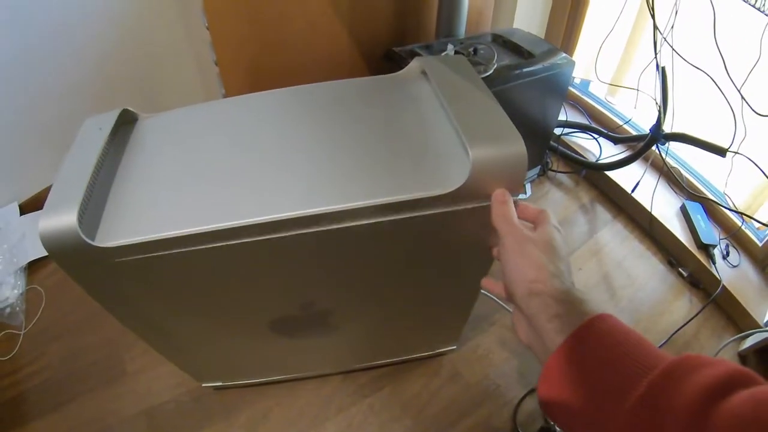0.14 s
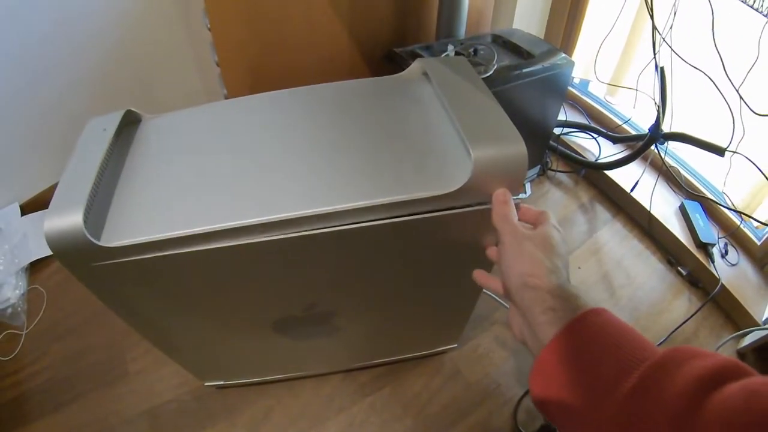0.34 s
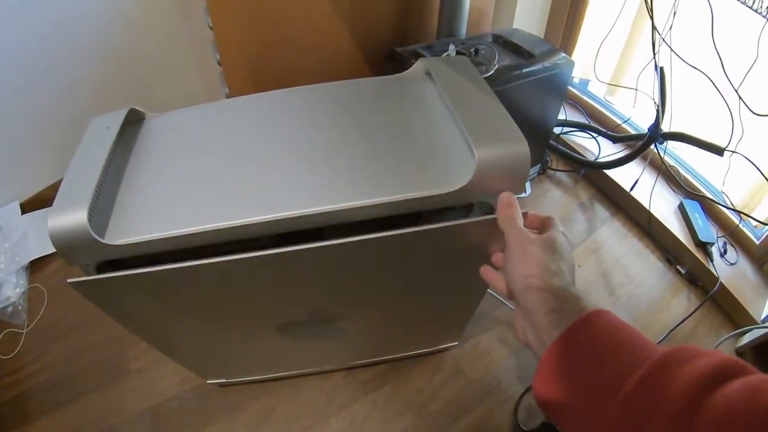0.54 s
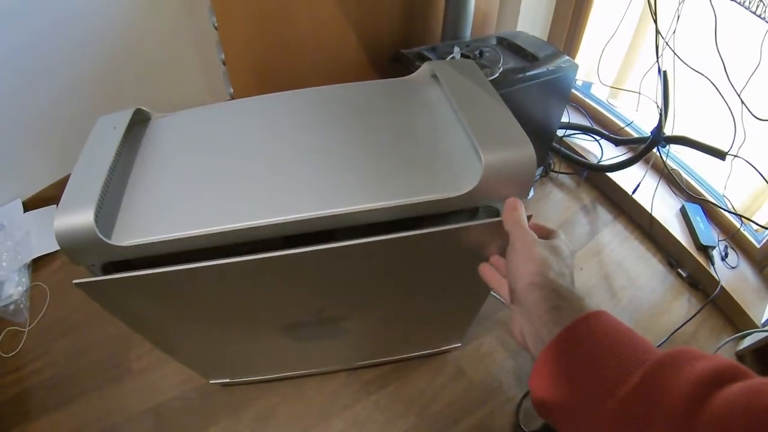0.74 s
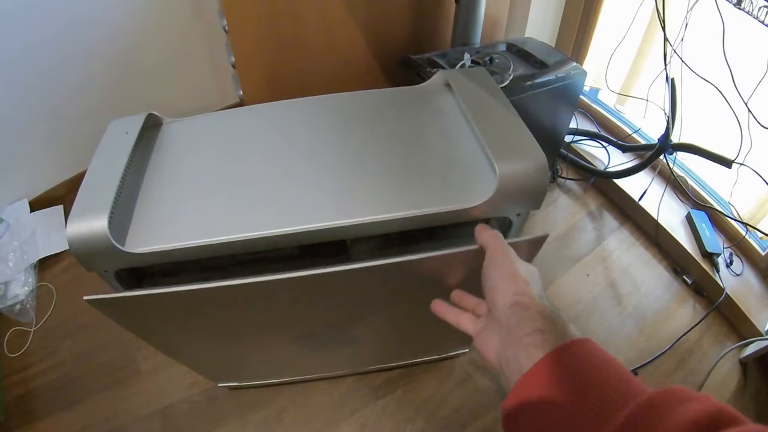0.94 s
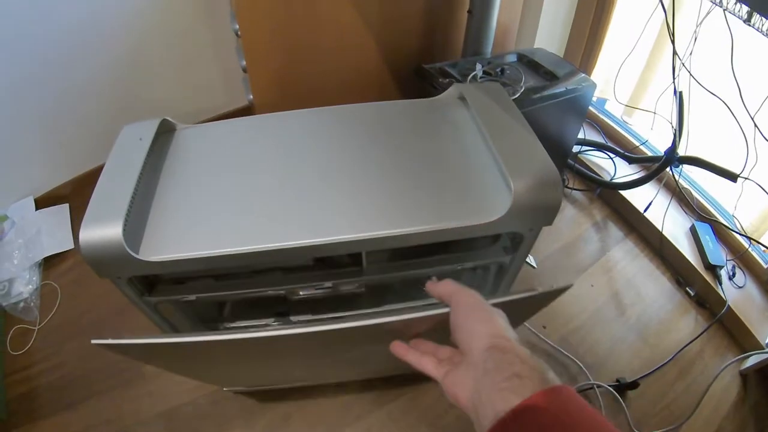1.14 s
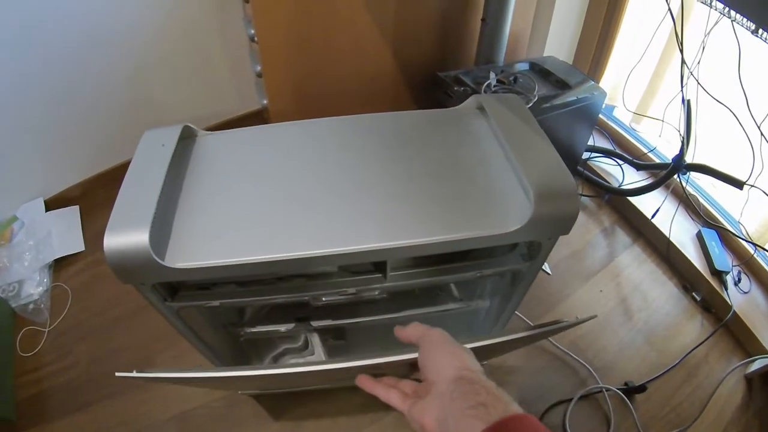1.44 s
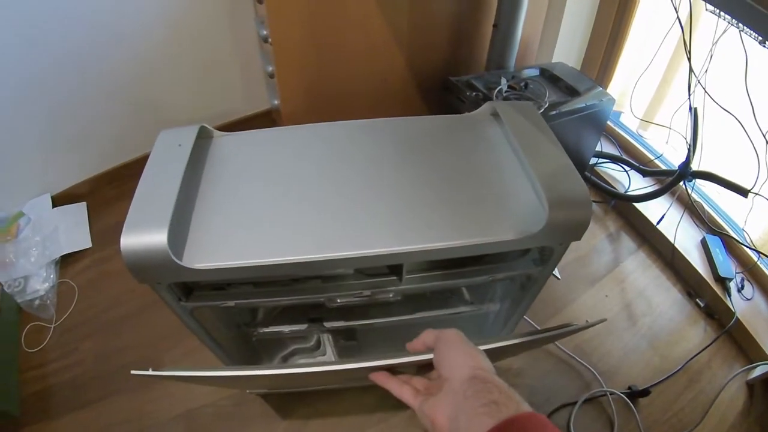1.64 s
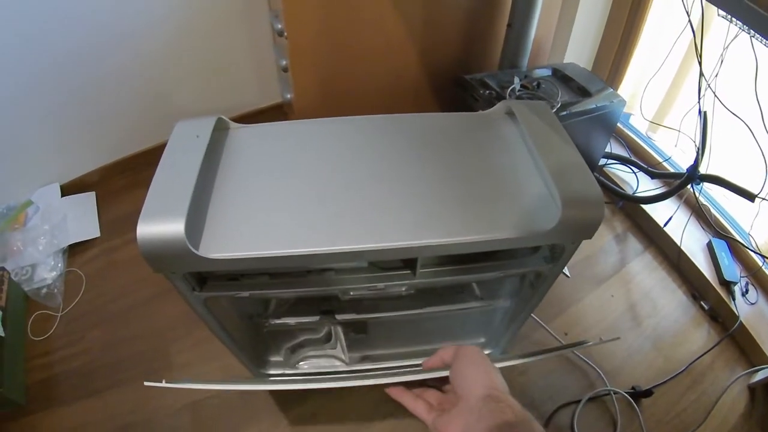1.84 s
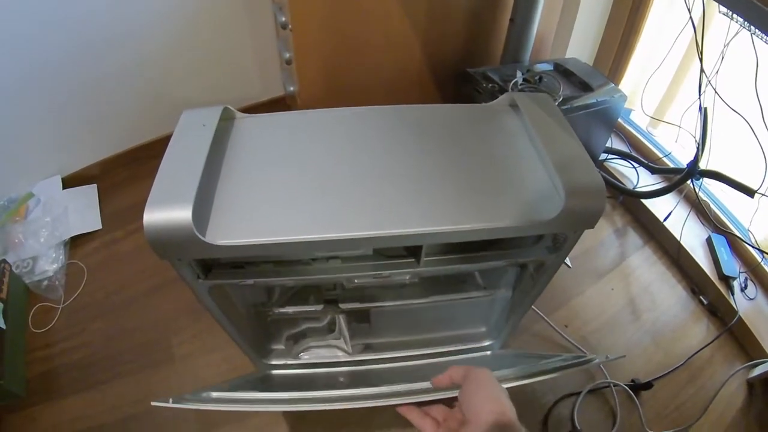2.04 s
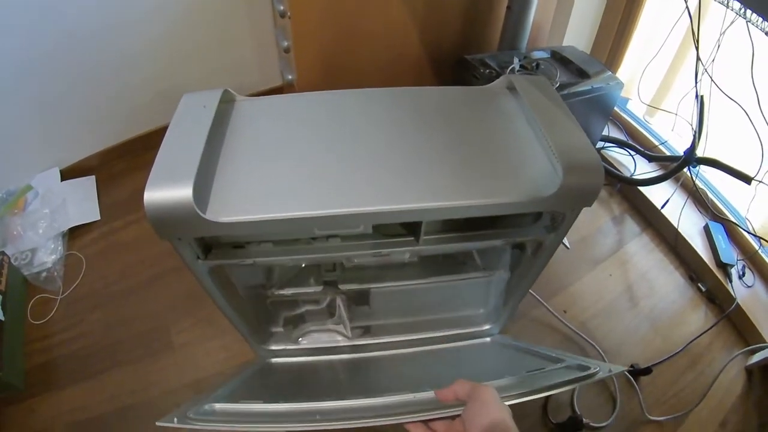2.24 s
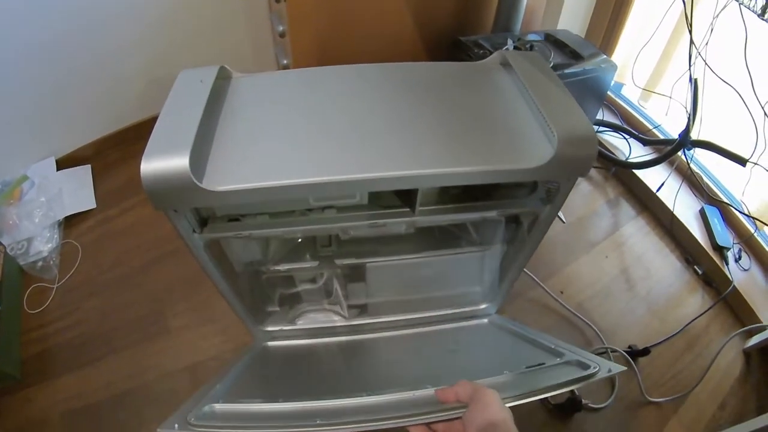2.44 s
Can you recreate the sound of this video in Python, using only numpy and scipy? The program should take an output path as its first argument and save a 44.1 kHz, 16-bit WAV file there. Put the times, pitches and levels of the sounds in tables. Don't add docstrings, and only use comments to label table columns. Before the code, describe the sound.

A sheet-metal side panel snaps off a computer case with clatter, then knocks in its slot

```python
import sys
import numpy as np
from scipy import signal
from scipy.fft import rfft, irfft, next_fast_len
from scipy.io import wavfile

SR = 44100
rng = np.random.default_rng(int(sys.argv[2]) if len(sys.argv) > 2 else 0)


def field_ratio(decibels):
    return 10 ** (np.asarray(decibels, dtype=float) / 20)


def log_audio(samples):
    frames = np.atleast_2d(samples).T
    limited = np.clip(frames, -1, 1)
    pcm = np.round(limited * 32767).astype(np.int16)
    wavfile.write(sys.argv[1], SR, pcm)


N = 114660


def rms_one(x):
    return x / np.sqrt(np.mean(x ** 2) + 1e-20)


def in_time(rows):
    s, *columns = np.transpose(rows)
    t = np.arange(N) / SR
    gate = np.clip(np.minimum(t - s[0], s[-1] - t) / 0.008, 0, 1)
    return [np.interp(t, s, c) for c in columns] + [gate]


def colour(x, points):
    hz, db = np.transpose(points)
    log_hz = np.log(np.arange(N // 2 + 1) * SR / N + 0.1)
    log_points = np.log([hz[0] / 2, *hz, hz[-1] * 2])
    gain_db = np.interp(log_hz, log_points, [db[0] - 30, *db, db[-1] - 30])
    return rms_one(irfft(rfft(x) * field_ratio(gain_db), N))


def drift(rate_hz):
    r = np.exp(-2 * np.pi * rate_hz / SR)
    return rms_one(signal.lfilter([1], [1, -2 * r, r * r], rng.standard_normal(N + SR))[SR:])


def ring(x, hz, t60):
    r, w = field_ratio(-60 / (t60 * SR)), 2 * np.pi * hz / SR
    return signal.lfilter([0, np.sin(w)], [1, -2 * r * np.cos(w), r * r], x + 1e-18)


def narrow_noise(hz, width_hz):
    t60 = np.log(1000) / np.pi / width_hz
    return rms_one(ring(rng.standard_normal(N + SR), hz, t60)[SR:])


# f/Hz, level/dB per Hz
AIR = [(30, -6), (45, -10), (71, -16.5), (281, -26.5), (500, -30.5), (4000, -42.5)]
# f/Hz, level/dB per Hz
HISS = [(3000, -5), (7500, -3), (10500, -5), (14500, -7)]
# f/Hz, level/dB rms
WHINES = [(9710, -72)]
AIR_DB, HISS_DB, WHINE_WIDTH_HZ = -56.5, -67, 90
CAPSULE_HZ, CAPSULE_WIDTH_HZ, CAPSULE_DB = 8800, 500, -72.5
SWAY_HZ, SWAY_WIDTH_HZ, SWAY_DB = 10.97, 5.7, -45.5


def background():
    air = field_ratio(AIR_DB) * colour(rng.standard_normal(N), AIR)
    hiss = field_ratio(HISS_DB) * colour(rng.standard_normal(N), HISS)
    capsule = field_ratio(CAPSULE_DB) * narrow_noise(CAPSULE_HZ, CAPSULE_WIDTH_HZ)
    whines = sum(field_ratio(db) * narrow_noise(hz, WHINE_WIDTH_HZ) for hz, db in WHINES)
    sway = rms_one(ring(narrow_noise(SWAY_HZ, SWAY_WIDTH_HZ), SWAY_HZ, 2 / SWAY_WIDTH_HZ))
    return air + hiss + capsule + whines + field_ratio(SWAY_DB) * sway


ROOM_T60_S, ROOM_DB, WALL_CUT_HZ = 0.14, -17.5, 8300


def room(x):
    size = next_fast_len(N + SR)
    z = np.exp(-2j * np.pi * np.arange(size // 2 + 1) / size)
    dull = np.exp(-2 * np.pi * WALL_CUT_HZ / SR)
    wall = (1 - dull) / (1 - dull * z)
    response = 0
    for k, lag in enumerate((np.geomspace(0.009, 0.031, 10) * SR).astype(int)):
        loop = field_ratio(-60 * lag / SR / ROOM_T60_S) * wall * z ** lag
        response = response + (-1) ** k * loop / (1 - loop)
    return irfft(rfft(x, size) * response, size)[:N]


# t/s, f/Hz, level/dB rms
SQUEAK = [
    (2.37, 7600, -81),
    (2.395, 7840, -74),
    (2.412, 8030, -67),
    (2.43, 8230, -63),
    (2.465, 8190, -64.5),
    (2.54, 8500, -61),
    (2.564, 7980, -69),
    (2.583, 7600, -72),
    (2.6, 7530, -80),
]
SQUEAK_WOBBLE_HZ, SQUEAK_FLUTTER_DB = 28, 3


def squeak():
    hz, db, gate = in_time(SQUEAK)
    phase = 2 * np.pi * np.cumsum(hz + SQUEAK_WOBBLE_HZ * drift(60)) / SR
    level = field_ratio(db + SQUEAK_FLUTTER_DB * drift(57))
    return gate * np.sqrt(2) * level * np.sin(phase)


# t/s, level/dB
PALM = [
    (0.93, -79),
    (0.978, -52.5),
    (1.002, -63),
    (1.068, -57),
    (1.132, -63),
    (1.266, -57.5),
    (1.302, -62.5),
    (1.428, -56.5),
    (1.56, -77.5),
]
# f/Hz, level/dB per Hz
SKIN = [(1500, -16), (2800, -8.5), (4150, -4), (5600, -8.5), (7500, -3), (8600, 1), (10000, -4.5),
        (14000, -16)]
# t/s, f/Hz
GAP = [
    (0.93, 8950),
    (1.064, 9050),
    (1.14, 8620),
    (1.2, 8800),
    (1.244, 8400),
    (1.316, 8700),
    (1.438, 8560),
    (1.56, 8620),
]
SKIN_PATCHY_DB, GAP_WIDTH_HZ, GAP_DB = -1, 400, -5


def palm():
    db, gate = in_time(PALM)
    hz, _ = in_time(GAP)
    phase = 2 * np.pi * np.cumsum(hz) / SR
    level = gate * field_ratio(db + SKIN_PATCHY_DB * drift(46))
    hiss = colour(rng.standard_normal(N), SKIN)
    whistle = drift(GAP_WIDTH_HZ) * np.cos(phase) + drift(GAP_WIDTH_HZ) * np.sin(phase)
    return level * (hiss + field_ratio(GAP_DB) * whistle)


# t/s, level/dB
FLEXES = [
    (0.497, -38.5),
    (0.53, -38.5),
    (0.732, -45.5),
    (0.862, -45),
    (2.301, -51),
]
FLEX_HZ, FLEX_T60_S, PUSH_HZ = 55.9, 0.45, 121


def flex():
    push = np.zeros(N)
    for s, db in FLEXES:
        push[int(s * SR)] = field_ratio(db)
    soft = signal.butter(2, PUSH_HZ, fs=SR, output="sos")
    return ring(signal.sosfilt(soft, push + 1e-18), FLEX_HZ, FLEX_T60_S)


# t/s, level/dB, f/Hz, t60/s
KNOCKS = [(0.217, -46, 330, 0.11), (0.25, -53.5, 454, 0.11), (0.232, -52, 575, 0.13),
          (0.492, -37.5, 424, 0.12), (0.512, -38, 424, 0.087), (0.506, -39, 1290, .05),
          (0.572, -40, 325, .08), (0.276, -50.5, 336, 0.11), (0.491, -41, 360, .12),
          (0.49, -47, 242, 0.088), (0.515, -38.5, 850, 0.11), (0.495, -44, 1245, 0.092),
          (0.57, -39, 625, 0.075), (0.555, -44, 333, 0.13), (0.612, -43, 418, 0.14),
          (2.235, -57, 635, 0.12), (2.24, -50, 196, 0.11), (2.309, -37.5, 412, 0.066),
          (2.303, -44.5, 694, 0.11), (2.303, -45, 880, 0.054), (2.308, -42.5, 244, .12),
          (0.5812, -27.5, 3620, .04), (0.538, -30, 5150, 0.036), (0.535, -32, 3600, 0.043),
          (0.629, -32.5, 4730, 0.034), (0.557, -36, 8350, .03), (2.303, -38.5, 4240, .02),
          (2.303, -41, 3040, .03), (0.9062, -46, 6550, .025), (0.909, -48, 2540, .045),
          (0.9455, -46.5, 2550, .04), (0.9062, -47.5, 4250, 0.044), (2.345, -46, 150.2, 0.42)]


def knocks():
    out = np.zeros(N)
    for s, db, hz, t60 in KNOCKS:
        t = np.maximum(np.arange(N) / SR - s, 0)
        rise = 1 - np.exp(-t * hz)
        out += field_ratio(db - 60 * t / t60) * rise * np.sin(2 * np.pi * hz * t)
    return out


# f/Hz, level/dB
EDGE_MODES = [(2560, -15), (3030, -4.5), (3620, -5), (4140, -2), (4750, -7), (5170, -8.5), (6935, -5.5),
              (7400, -19), (8310, -4), (8650, -4.5), (8820, 0)]
EDGE_T60_S, EDGE_RING_DB = 0.035, -7.5


def edge_ring(x):
    modes = sum(field_ratio(db) * ring(x, hz, EDGE_T60_S) for hz, db in EDGE_MODES)
    return field_ratio(EDGE_RING_DB) * modes / np.sqrt(EDGE_T60_S * SR)


GRAINS_PER_S, GRAIN_SPREAD_DB = 5000, 3.0


def grains():
    sizes = field_ratio(GRAIN_SPREAD_DB * np.minimum(rng.exponential(1, N), 4)) * rng.choice([-1, 1], N)
    return rms_one(sizes * (rng.random(N) < GRAINS_PER_S / SR))


# t/s, speed as bright level/dB, weight on the sheet as dull level/dB
STROKES = [
    [(0.11, -82, -62), (0.128, -66, -69), (0.17, -56.5, -66), (0.19, -54.5, -58), (0.21, -65, -58),
     (0.228, -74, -55), (0.256, -88, -60.5), (0.3, -85, -66)],
    [(0.472, -63, -68), (0.488, -53.5, -49.5), (0.5, -44, -41.5), (0.508, -38.5, -36.5),
     (0.558, -38.5, -36), (0.6, -43.5, -41.5), (0.622, -46, -46), (0.66, -49, -49), (0.78, -69.5, -59.5)],
    [(0.83, -55, -72), (0.852, -77, -62.5), (0.92, -62, -57.5), (0.935, -68, -64), (0.956, -56, -58),
     (1.0, -74, -71)],
    [(2.275, -68, -62), (2.288, -53, -56), (2.3, -46, -55), (2.315, -53, -41), (2.34, -58, -52),
     (2.37, -62, -57.5), (2.42, -69, -69), (2.44, -73, -63)],
]
# f/Hz, level/dB per Hz
EDGE = [(710, -29), (1200, -7.5), (1850, -6.5), (2010, -6), (2850, -7), (3600, -6), (6220, -5.5),
        (8370, -4), (14000, -33)]
# f/Hz, level/dB per Hz
BODY = [(170, -15), (270, -5), (420, -7.5), (833, -3.5), (1500, -8.5), (2500, -13)]
# f/Hz, level/dB, t60/s
PANEL = [(234.7, -6.5, 0.26), (328.3, -10, 0.23), (417, -0.5, 0.054), (500.4, -3, 0.12), (624, -9.5, 0.073),
         (670, -9, 0.2), (850.4, -7, 0.073), (1052, -18, 0.13), (1248, -11, 0.17), (1375, -12.5, 0.24),
         (1957, -12.5, 0.18)]
GRIND_DB, BODY_DB, PANEL_DB = -1, -4.5, 3.5


def grinding():
    bright, weight = np.zeros(N), np.zeros(N)
    for stroke in STROKES:
        speed_db, weight_db, gate = in_time(stroke)
        bright += gate * field_ratio(speed_db)
        weight += gate * field_ratio(weight_db)
    rub = grains()
    modes = sum(field_ratio(db) * ring(rub * weight, hz, t60) / np.sqrt(t60 * SR) for hz, db, t60 in PANEL)
    scrape = field_ratio(GRIND_DB) * bright * colour(grains(), EDGE)
    body = field_ratio(BODY_DB) * weight * colour(rub, BODY)
    return scrape + body + field_ratio(PANEL_DB) * modes


# t/s, peak level/dB, f/Hz
TICKS = [(0.4837, -44, 9000), (0.4877, -35, 8600), (0.5045, -22, 9100), (0.5064, -19, 8500),
         (0.5111, -24.5, 1790), (0.5227, -32, 7400), (0.525, -33, 6400), (0.5301, -33, 2800),
         (0.5339, -25.2, 6700), (0.5357, -26, 4000), (0.5386, -16, 7400), (0.54, -14, 5150),
         (0.5413, -16, 7100), (0.5544, -22.3, 9000), (0.5593, -22, 8100), (0.5645, -28, 3300),
         (0.568, -28.7, 2380), (0.571, -25, 8300), (0.575, -27, 8100), (0.5817, -12, 4840),
         (0.584, -14, 8450), (0.6076, -37, 8550), (0.6107, -33.6, 8800), (0.6149, -37, 3700),
         (0.6195, -35.2, 7600), (0.6292, -20, 6600), (0.6316, -21, 4830), (0.6421, -32.8, 7500),
         (0.6524, -35.8, 7400), (0.6593, -35.7, 7800), (0.6627, -37.9, 6500), (0.669, -39.0, 4700),
         (0.6743, -40.4, 3800), (0.6775, -41.6, 8400), (0.6815, -38, 4600), (0.6853, -44, 1800),
         (0.9065, -35.1, 3800), (0.9102, -39.2, 3900), (0.9133, -39, 2500), (0.9168, -43.0, 3900),
         (0.9247, -48.6, 3700), (0.9354, -48.6, 3500), (0.9447, -46.2, 4300), (0.9463, -39.6, 2600),
         (0.9524, -44.2, 2800), (0.9568, -45.5, 9000), (0.9585, -46.3, 9200), (2.2949, -40, 7400),
         (2.2973, -38.3, 6500), (2.3002, -37.0, 7100), (2.303, -21.5, 3420), (2.3053, -30, 3640),
         (2.3074, -33, 1790), (2.3119, -38, 2800), (2.319, -36.7, 2300), (2.322, -34, 2500),
         (2.3326, -39, 4800), (2.3375, -38, 2800)]
TICK_DB, TICK_CYCLES, TICK_LEAD_S, TICK_RISE_CYCLES = 1.5, 8.8, 0.0003, 1.26


def ticks():
    out, t = np.zeros(N + 512), np.arange(512) / SR
    for s, db, hz in TICKS:
        i = int((s - TICK_LEAD_S) * SR)
        decay = field_ratio(db + TICK_DB - 60 * t * hz / TICK_CYCLES)
        rise = np.minimum(t * hz / TICK_RISE_CYCLES, 1)
        out[i:i + 512] += decay * rise * np.sin(2 * np.pi * hz * t)
    return out[:N]


# t/s, peak level/dB, centre f/Hz, width/octaves, rattle length/s
SNAPS = [(0.138, -43, 7050, .6, .001), (0.174, -44, 5750, 0.33, 0.014), (0.186, -43, 3570, 0.2, .005),
         (0.5036, -25, 8500, 0.47, 0.0077), (0.5342, -20.5, 6500, 1.3, 0.0048),
         (0.5376, -16, 6130, 0.83, 0.0033), (0.5812, -18, 5000, 0.51, 0.003),
         (0.5822, -19, 6600, 1.42, 0.0053), (0.63, -23, 6500, 0.85, 0.0041), (0.685, -40, 2480, 1.2, 0.011),
         (0.729, -38.5, 4700, 0.35, 0.0045), (0.857, -47, 1480, 2.7, 0.0066),
         (0.907, -40.5, 2610, 0.14, 0.0032), (0.9054, -38, 4000, 0.19, 0.0032),
         (0.9058, -40, 6650, 0.27, 0.003), (0.946, -44, 2530, 0.37, 0.0032),
         (0.945, -40.5, 4000, 0.83, 0.0022), (0.91, -46, 1430, 0.58, 0.0067),
         (1.976, -51, 8500, 0.27, 0.0043), (2.0865, -43.5, 8800, 0.24, 0.0017),
         (2.303, -29, 3570, 0.84, 0.003), (2.3027, -32, 7950, 0.48, 0.0034),
         (2.305, -38.5, 2270, 1.5, 0.019)]
# f/Hz, level/dB
PORT = [(500, 8), (6000, -5), (8700, -0.5), (10200, -3.5), (14000, -20)]
SNAP_DB, FIRST_TOUCH_DB, TAIL_DB, TAIL_TIMES, SKIRT_DB = -0.5, 3, -12.5, 3.7, -25.5


def snaps():
    size, lead = 4096, 32
    out = np.zeros(N + size)
    t, hz = np.arange(size) / SR, np.arange(1, size // 2 + 2) * SR / size
    port_hz, port_level = np.transpose(PORT)
    port_db = np.interp(np.log(hz), np.log(port_hz), port_level)
    rattles = rng.standard_normal((len(SNAPS), 2, size)) * rng.uniform(0.4, 1.4, (len(SNAPS), 2, size))
    for (s, db, centre_hz, width, length), (fast, slow) in zip(SNAPS, rattles):
        tail = field_ratio(TAIL_DB) * slow * np.exp(-t / (TAIL_TIMES * length))
        burst = fast * np.exp(-t / length) + tail
        burst[0] = field_ratio(FIRST_TOUCH_DB)
        bell_db = np.maximum(-6 * (np.log2(hz / centre_hz) / width) ** 2, SKIRT_DB)
        burst = irfft(rfft(np.roll(burst, lead)) * field_ratio(bell_db + port_db), size)
        loudness = np.sqrt(np.sum(burst ** 2) / (length * SR))
        i = int(s * SR) - lead
        out[i:i + size] += field_ratio(db + SNAP_DB) * burst / loudness / 3
    return out[:N]


PALM_RING_DB = -14


def scene():
    skin = palm()
    metal = grinding() + snaps() + ticks()
    hard = metal + edge_ring(metal + field_ratio(PALM_RING_DB) * skin) + knocks()
    mix = hard + field_ratio(ROOM_DB) * room(hard) + flex() + skin + squeak() + background()
    return mix[None]


def roll_off(x):
    return signal.sosfilt(signal.butter(12, 15040, fs=SR, output="sos"), x)


TOP_CUT_HZ, OFFSET = 13900, -0.0017


def record(dry):
    top_cut = signal.cheby2(10, 25, TOP_CUT_HZ * 1.04, fs=SR, output="sos")
    return roll_off(signal.sosfiltfilt(top_cut, dry) + OFFSET)


dry = scene()
out = record(dry)
log_audio(out)
```